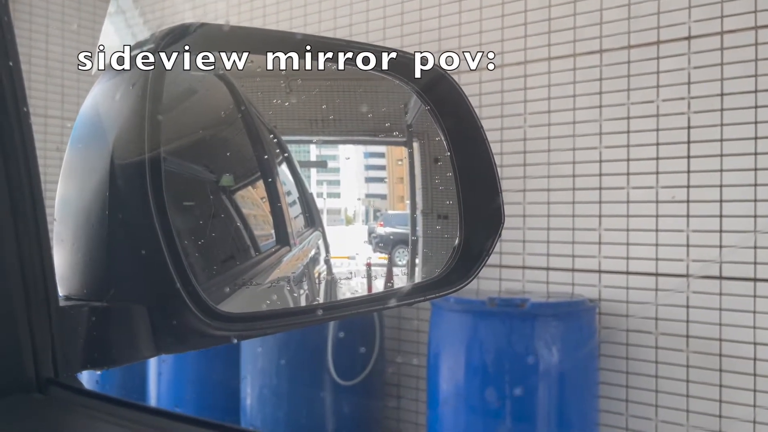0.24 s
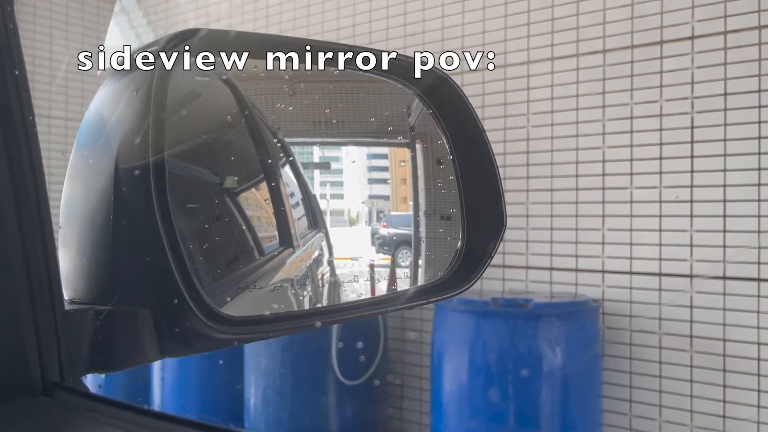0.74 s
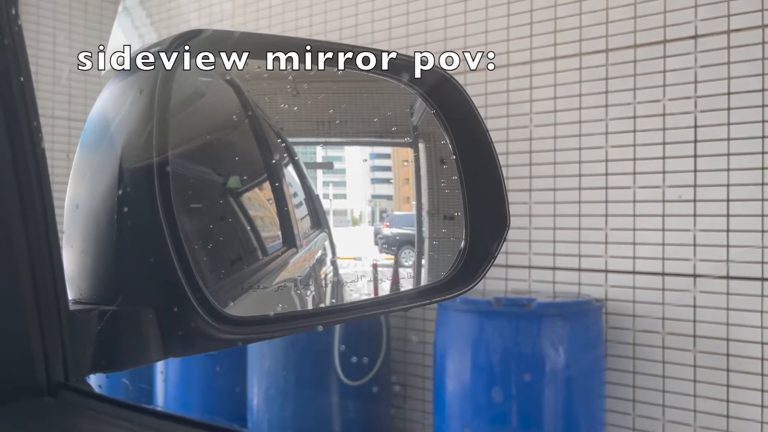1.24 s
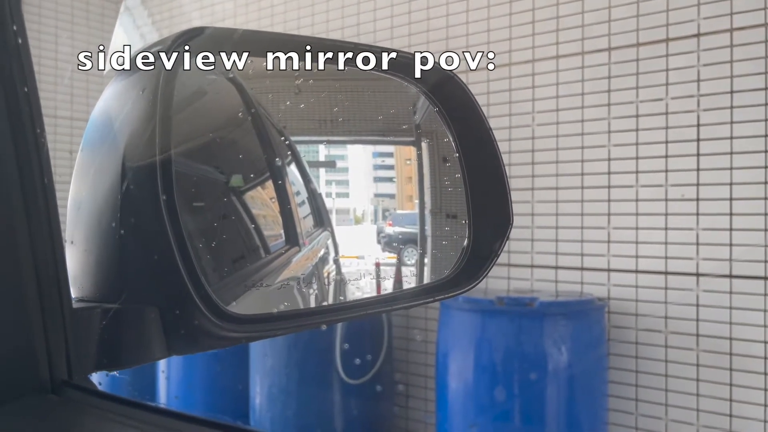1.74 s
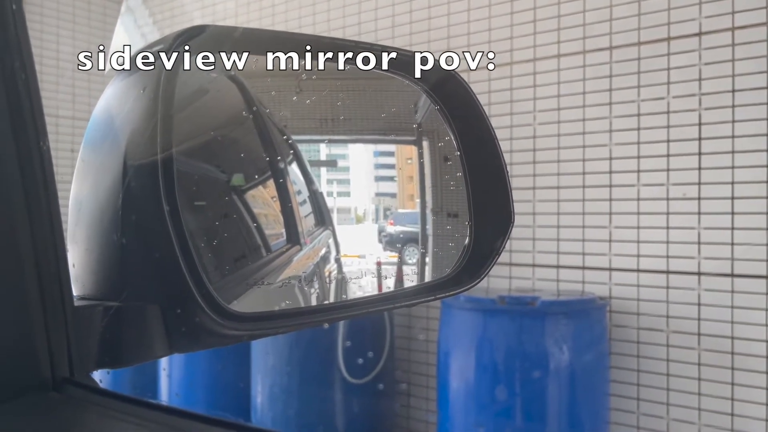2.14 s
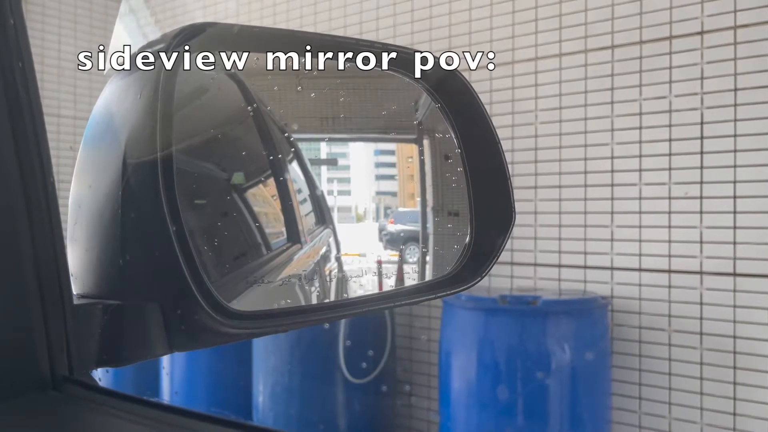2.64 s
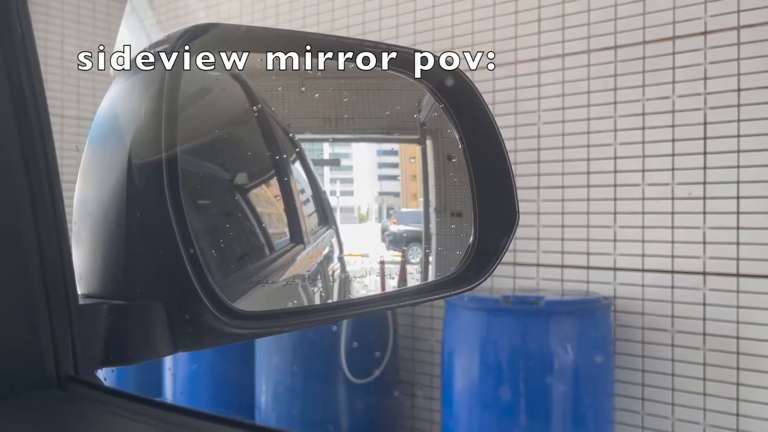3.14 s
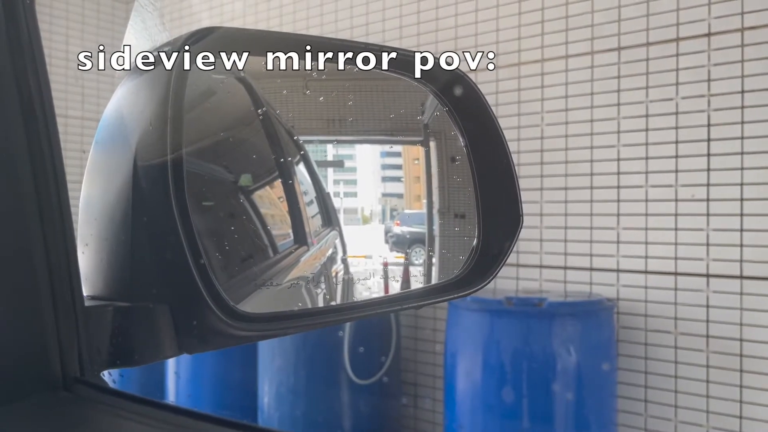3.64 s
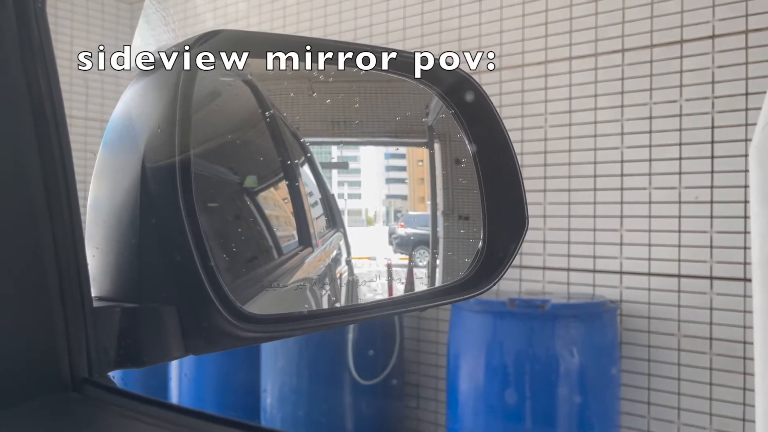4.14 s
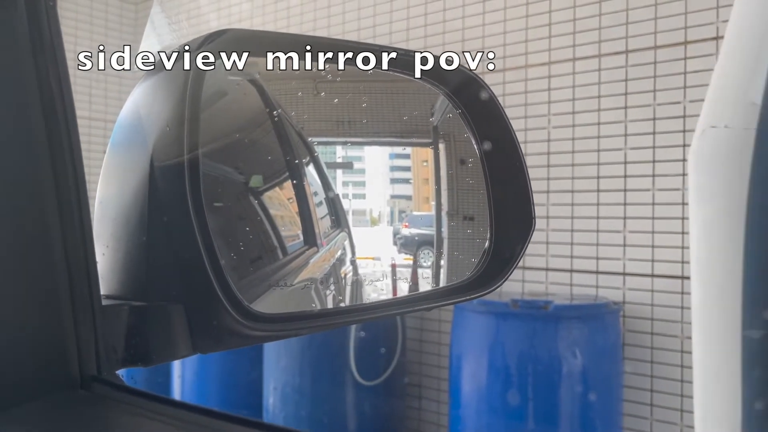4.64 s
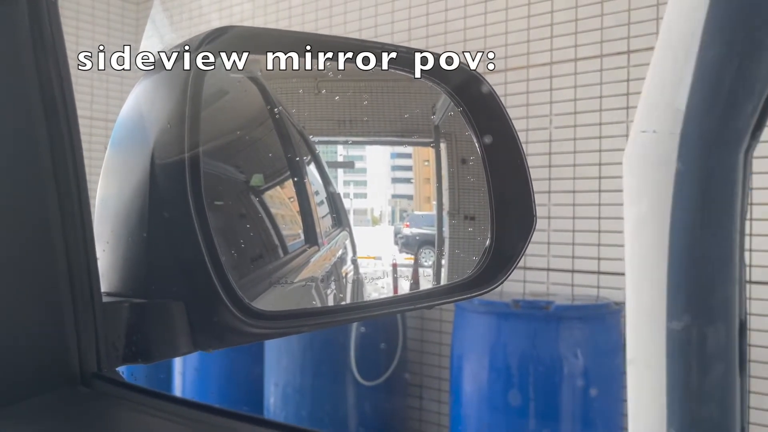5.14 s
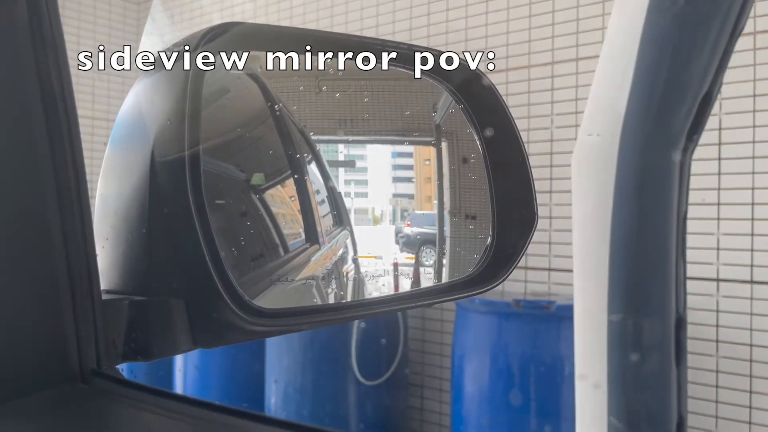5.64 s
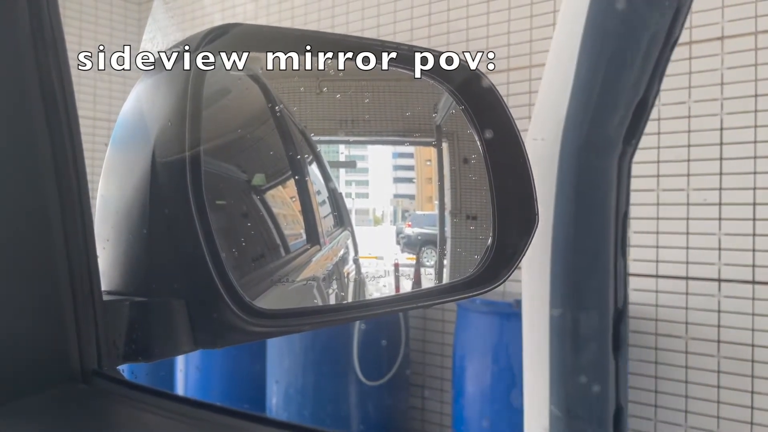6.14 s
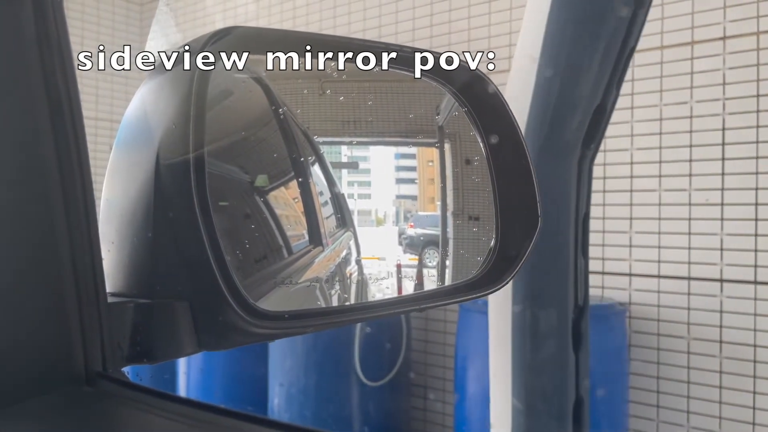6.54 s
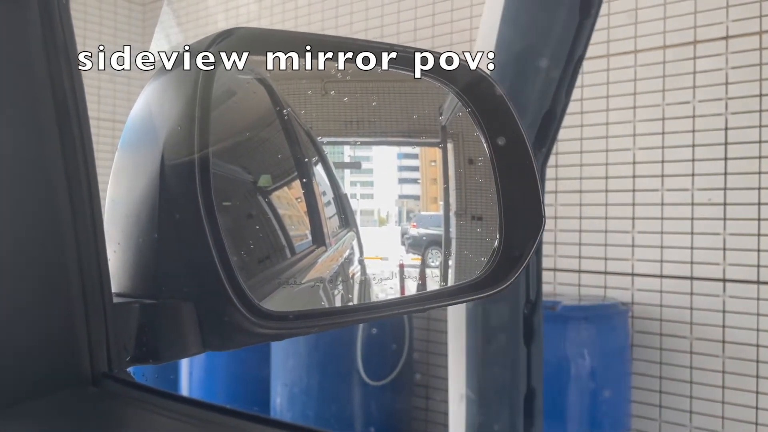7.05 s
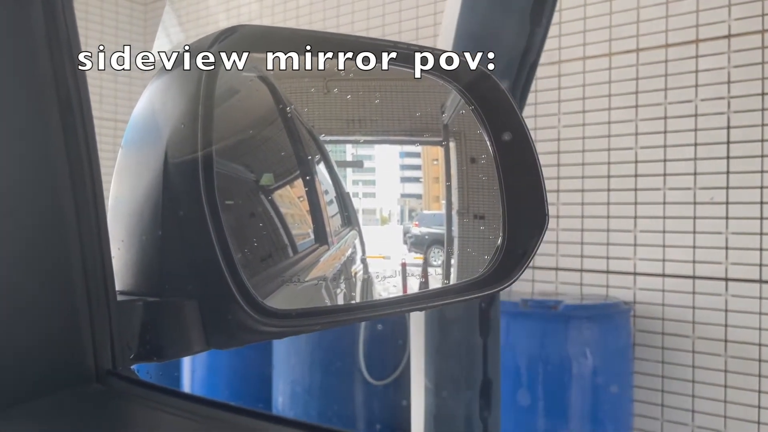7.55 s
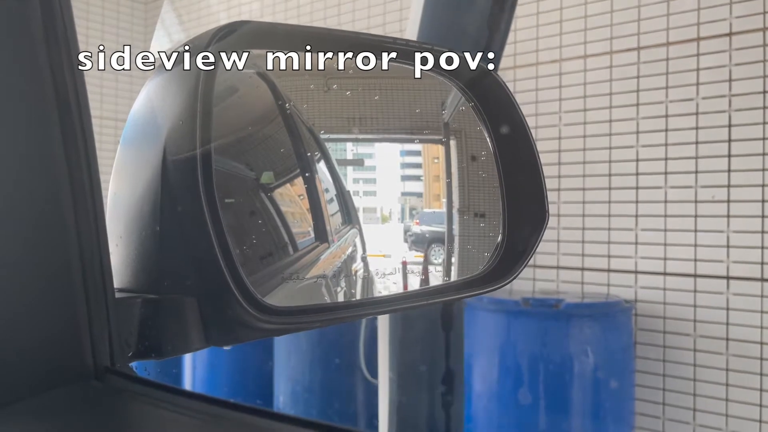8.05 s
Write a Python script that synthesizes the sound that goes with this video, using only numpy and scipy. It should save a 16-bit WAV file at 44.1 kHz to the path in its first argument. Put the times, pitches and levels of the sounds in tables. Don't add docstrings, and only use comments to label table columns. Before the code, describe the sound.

From 0 s a dense, bass-heavy roar fills a closed car cabin: dryer air outside booms in the enclosed air and rumbles on the panels. Rapid flutter, roughly eleven pulses a second, breaks into irregular dull thuds and slaps on the window, with a strong one near 1.4 s. From about 2 to 3.5 s the jet presses harder, several slaps cluster around 2.6-2.9 s, and a hollow low door resonance swells near 3 s. Quiet blower hiss, a nozzle's thin sizzle and a very faint high motor whine lie behind; the sizzle fades after 3.7 s. The heaviest slap lands at 4.0 s, followed by more buffeting to 5 s. The deep boom is thinner later, and tiny drops crack on the glass mostly between 6.8 and 7.6 s. Another strong slap comes at 7.95 s, then the roar suddenly eases just after 8.2 s. Close stereo cabin pickup, muffled and nearly without echo.

```python
import sys
import numpy as np
from scipy import signal
from scipy.fft import rfft, irfft, next_fast_len
from scipy.io import wavfile
from scipy.ndimage import uniform_filter1d, minimum_filter1d, map_coordinates

SR = 44100
rng = np.random.default_rng(int(sys.argv[2]) if len(sys.argv) > 2 else 0)


def field_ratio(decibels):
    return 10 ** (np.asarray(decibels, dtype=float) / 20)


def bounce(signal):
    frames = np.transpose(np.atleast_2d(signal))
    limited = np.clip(frames, -1, 1)
    pcm = np.round(limited * 32767).astype(np.int16)
    wavfile.write(sys.argv[1], SR, pcm)


N = 365140
T_S = np.arange(N) / SR

# (frequency [Hz], level [dB])
PORTS = [(60, -20.5), (110, -17.5), (190, -13), (350, -14), (630, -7), (1120, -1), (2020, 3.5), (3620, 1),
         (6510, -6), (11700, 0)]


def unit(x):
    return x / np.sqrt(np.mean(x ** 2) + 1e-20)


def along(points, hz):
    f, v = np.transpose(points)
    return np.interp(np.log(hz + 1), np.log(f + 1), v)


def curves(rows):
    s, *cols = np.transpose(rows)
    return [np.interp(T_S, s, c) for c in cols]


def wobble(rate_hz):
    knots = rng.standard_normal(int(N * rate_hz / SR) + 4)
    return map_coordinates(knots, [np.arange(N) * rate_hz / SR])


def filtered(x, response):
    m = next_fast_len(N + 8192)
    return irfft(rfft(x, m) * response(np.fft.rfftfreq(m, 1 / SR)), m)[..., :N]


def unlike(both, other):
    # (frequency [Hz], share [-1..1])
    lead = [(60, .3), (300, .6), (700, .5), (1200, .45), (1600, 0), (2000, -.4), (2500, .3), (7000, .4),
            (9000, 0)]
    locked = filtered(both, lambda hz: 1j * along(lead, hz))
    return locked + filtered(other, lambda hz: np.sqrt(1 - along(lead, hz) ** 2))


def rush(spectrum, patchy_db=0, diff_spectrum=None, diff_db=0, grain=1):
    z = signal.stft(rng.standard_normal((2, N)), nperseg=512)[2]
    field = uniform_filter1d(rng.standard_normal(z.shape[1:]), size=6, axis=0)
    field = uniform_filter1d(field, size=10, axis=1)
    patchy = z * field_ratio(patchy_db * unit(field))
    both, other = grain * signal.istft(patchy, nperseg=512)[1][:, :N]
    apart = unlike(both, other)
    both = filtered(both, lambda hz: field_ratio(along(spectrum, hz)))
    if diff_spectrum:
        apart = filtered(apart, lambda hz: field_ratio(along(diff_spectrum, hz)))
        return np.array([unit(both), field_ratio(diff_db) * unit(apart)])
    apart = filtered(apart, lambda hz: field_ratio(along(spectrum, hz) + along(PORTS, hz)))
    return np.array([both, apart]) / np.std(both)


def puffs(times_s, gains, spectrum, after):
    lag_s, share = np.transpose([(0.0011, 0.82)] + after)
    chance = rng.random((len(times_s), 2, len(lag_s)))
    at_s = times_s[:, None] + lag_s * (0.744 + .5 * chance[:, 0])
    height = gains[:, None] * share * np.sign(chance[:, 1] - .5)
    kicks = np.bincount((at_s * SR).astype(int).ravel(), height.ravel(), N)[:N]
    peak = np.mean(field_ratio(along(spectrum, np.linspace(0, SR / 2, SR))))

    def colour(hz):
        return field_ratio(along(spectrum, hz)) * np.array([1 + 0j * hz, 1j * field_ratio(along(PORTS, hz))])

    return filtered(kicks / peak, colour)


def steadied(pair, share, smooth_s):
    envelope = np.abs(signal.hilbert(pair[0], next_fast_len(N))[:N])
    swell = uniform_filter1d(envelope, size=int(smooth_s * SR))
    pair = pair / (swell + 0.14 * swell.mean()) ** share
    return pair / np.std(pair[0])


def jet():
    # (time [s], cabin air drive [dB], turbulence on the glass [dB], eddy beat depth [dB])
    path = [(0, -13.5, -18.5, -0.5), (.7, -14, -17.5, 2), (1.4, -12.5, -16, 5), (1.8, -15.5, -17, -1),
            (2.33, -12.5, -14.5, 0), (2.5, -17, -16.5, -0.5), (2.9, -13.5, -14.5, -0.5),
            (3.6, -19, -14.5, -1), (4.2, -18.5, -14, 2), (4.8, -20, -15, 0), (5.5, -16.5, -15.5, 2),
            (6, -17, -16.5, -1), (6.5, -18.5, -17, 0.5), (6.9, -18.5, -15.5, 4.5), (7.4, -19.5, -16.5, 1),
            (7.75, -18, -17.5, 0), (7.95, -21.5, -17, 8), (8.2, -15.5, -16, -1)]
    lull_s, lull_fall_s, lull_end_db = 8.215, 0.022, -11.5
    drive_db, turbulence_db, beat_db = curves(path)
    lull_db = lull_end_db * np.clip((T_S - lull_s) / lull_fall_s, 0, 1)
    return drive_db + lull_db, turbulence_db + lull_db, beat_db, lull_db


def shedding():
    shed_hz, lead_cycles, wander_cycles = 11.0, .46, .1
    return np.cos(2 * np.pi * (shed_hz * T_S + lead_cycles + wander_cycles * wobble(2.67)))


def gusts(times_s):
    hush_s, gust_s, gust_db = 0.0058, 0.021, 3
    t = np.arange(-SR // 10, SR // 10 + 1) / SR
    shape = np.exp(-((t - .014) / gust_s) ** 2) - 0.79 * np.exp(-((t + 0.015) / hush_s) ** 2)
    eddies = np.bincount((times_s * SR).astype(int), minlength=N)
    return gust_db * signal.fftconvolve(eddies, shape, "same")


def blowers():
    # (frequency [Hz], density [dB per Hz])
    hiss_sum = [(1000, -11), (1700, -4.5), (1940, -6), (2340, -4.5), (2970, -10), (3500, -9), (4000, -12.5),
                (5790, -16.5), (6190, -15), (7060, -22), (8810, -18.5), (9900, -21), (10900, -23),
                (12400, -29), (12500, -90)]
    hiss_diff = [(1000, -27), (1700, -5), (2060, -13.5), (2850, -9.5), (3300, -14.5), (5260, -18.5),
                 (6440, -23), (8010, -25), (8600, -22.5), (9200, -24), (10000, -18.5), (11000, -24.5),
                 (11600, -31), (11750, -87.5)]
    sizzle_sum = [(1900, -33.5), (2400, -2.5), (3200, -8.5), (4200, 1), (4800, -12.5), (7000, -18.5),
                  (7550, -10), (8100, -15), (8700, -8.5), (10000, -13.5), (11100, -7.5), (12200, -22.5),
                  (12500, -72.5)]
    sizzle_diff = [(2400, -55.5), (3000, 6), (3500, -10), (8000, -21), (8600, -21), (9900, -2), (11100, -4),
                   (11600, -22), (11800, -68)]
    # (frequency [Hz], level [dB])
    sidebands = [(8240, -77), (8435, -74), (8667, -70), (8899, -81.5), (8980, -85.5), (9134, -75),
                 (9561, -84.5)]
    # (time [s], nearness [dB])
    nozzle = [(0, -60.5), (1.0, -58.5), (1.9, -57), (2.3, -56.5), (2.64, -57.5), (2.72, -56.5), (2.84, -58),
              (3.35, -58.5), (3.7, -60), (3.9, -63), (4.3, -66), (8.28, -74.5)]
    hiss_start_db, hiss_fade_db_per_s, hiss_follows = -46.5, -0.1139, 0.2

    nearness_db, = curves(nozzle)
    flutter = wobble(5.1)
    hiss_db = hiss_start_db + hiss_fade_db_per_s * T_S + hiss_follows * (nearness_db + 59.5)
    hiss_db = hiss_db + 0.14 + .15 * flutter
    hiss = field_ratio(hiss_db) * rush(hiss_sum, 1.0, hiss_diff, diff_db=-3.0)
    sizzle_db = 2.7 * (nearness_db + 59) - 56.5 + 0.44 * flutter + .8 * wobble(19) + 0.6 * wobble(26)
    sizzle = field_ratio(sizzle_db) * rush(sizzle_sum, 1.4, sizzle_diff, diff_db=-2.0)

    whine = np.zeros((2, N))
    for port, shift_hz in enumerate((0, 1235)):
        for hz, db in sidebands:
            level = field_ratio(db + 2 + 1.5 * wobble(6))
            whine[port] += level * np.sin(2 * np.pi * (hz + shift_hz) * T_S + 1.5 * wobble(25))
    return hiss + sizzle + whine


def roar(shed):
    # (frequency [Hz], density [dB per Hz])
    boom_spectrum = [(15, -44.5), (25, -29), (41, -7), (58, 3.5), (75, -1), (100, -7), (125, -13.5),
                     (170, -46.5), (290, -120)]
    panel_spectrum = [(35, -34.5), (60, -22.5), (92, 1), (135, 3.5), (177, -1.5), (226, -3), (300, -14.5),
                      (390, -44.5), (660, -120)]
    # (time [s], push [dB])
    push = [(0, -20), (.7, -17.5), (1.4, -18), (2.1, -19), (2.5, -18.5), (2.9, -17.5), (3.4, -17.5),
            (4.2, -16), (5, -17.5), (5.7, -18), (6.35, -18), (6.9, -16.5), (7.5, -20), (8.2, -19)]
    cabin_hz, cabin_width_hz = 84.4, 16.8
    door_hz, door_width_hz = 253, 45
    door_s, door_span_s = 3.03, 0.96

    drive_db, _, beat_db, lull_db = jet()
    over_db = drive_db + 15.5
    boom_db = -16.5 + .6 * over_db - 0.4 * (T_S - 4) + 1.8 * wobble(13)
    mode_db = -15 + 1.5 * over_db + 1.3 * wobble(11)
    rumble_db = 4 + curves(push)[0] + 0.74 * lull_db + 0.49 * beat_db * shed + 1.32 * wobble(8)
    door_db = -23 - 6 * ((T_S - door_s) / door_span_s) ** 2 + 1.5 * wobble(5.1)

    def resonance(hz):
        damping = 1j * hz * cabin_width_hz
        return (damping / (cabin_hz ** 2 - hz ** 2 + damping)) ** 2

    mode = filtered(rush([(60, 0), (120, -.1)]), resonance)
    mode = steadied(mode, share=1.0, smooth_s=0.062)
    boom = steadied(rush(boom_spectrum), share=0.52, smooth_s=0.052)
    rumble = steadied(rush(panel_spectrum), share=0.5, smooth_s=0.051)
    door = rush([(100, -40), (door_hz - door_width_hz, -12), (door_hz, 0),
                 (door_hz + door_width_hz, -12), (600, -60)])
    return field_ratio(door_db) * door + field_ratio(boom_db) * boom + field_ratio(mode_db) * mode + field_ratio(rumble_db) * rumble


def buffet(shed):
    # (time [s], peak [dB], edge over peak [dB])
    strong = [(0.294, -8.5, -19), (0.449, -9, -7.5), (0.721, -7.5, -31), (0.998, -13, -17),
              (1.38, -2, -13.5), (1.452, -7, -27), (2.376, -8.5, -17), (2.596, -7, -24), (2.744, -6, -24),
              (2.853, -1.5, -26), (3.412, -10.5, -7.5), (3.487, -14.5, -21), (3.936, -6, -13.5),
              (4.017, 3, -22.5), (4.057, -6.5, -14.5), (4.157, -4.5, -26), (4.349, -7, -20.5),
              (4.387, -6, -16.5), (4.41, -12.5, -21.5), (4.661, -7, -24), (4.755, -6.5, -19.5),
              (4.936, -3.5, -21.5), (6.602, -15, -19), (6.8, -6.5, -20.5), (6.85, -10, -20),
              (6.961, -10, -11.5), (7.209, -9.5, -7), (7.388, -15, -23.5), (7.594, -11.5, -12.5),
              (7.95, -1, -25), (8.245, -17.5, -25)]
    lesser = [(0.091, -9, -20), (0.256, -2, -24), (0.345, -4, -20), (0.542, -8.5, -25), (0.618, -7, -20),
              (0.694, -5.5, -19), (0.779, -7.5, -19), (0.898, -8.5, -14), (0.938, -14.5, -17),
              (1.045, -0.5, -16.5), (1.181, -2, -25), (1.71, -8.5, -12), (1.75, -6.5, -18),
              (1.787, -10, -22), (1.845, -3.5, -21), (2.176, -6.5, -29), (2.203, -6, -13), (2.238, -9, -17),
              (2.335, -4.5, -18.5), (2.489, -4.5, -23), (2.537, -5, -20), (2.572, -2, -16.5),
              (2.715, -0.5, -14.5), (2.8, -5.3, -18), (2.945, 0.7, -26), (3.106, -9, -14),
              (3.331, -4.5, -29), (3.573, -3, -12.5), (3.629, -6, -16), (4.322, -16, -22),
              (4.578, -2, -10.5), (4.693, -8, -11.5), (4.841, -3.7, -18), (5.021, -9, -19),
              (5.048, -8, -14), (5.094, -5, -19.5), (5.199, -6.5, -25), (5.398, -6.5, -22),
              (5.518, -9.5, -25.5), (5.573, -7.5, -26), (5.668, -9.5, -21), (5.805, -9.5, -15.5),
              (6.002, -6, -12), (6.084, -4, -16), (6.115, -13.5, -15.5), (6.174, -6.5, -29),
              (6.22, -4, -18.5), (6.369, -9.5, -11.5), (6.579, 2, -25), (6.663, -6, -11.5), (6.75, -6, -18),
              (6.904, -5.5, -29), (7.142, -2.5, -20), (7.317, -7, -14.5), (7.419, -7, -28.5),
              (7.5, -18, -22.5), (7.663, -6, -21.5), (7.864, -9.5, -15), (8.043, -7.5, -28.5),
              (8.205, -11, -22)]
    # (time [s], peak [dB])
    drops = [(1.3793, -32), (4.3884, -30), (6.8007, -28.5), (6.8683, -34), (6.989, -30), (7.2085, -26.5),
             (7.5933, -32)]
    # (frequency [Hz], density [dB per Hz])
    thud_spectrum = [(120, -39), (200, -3), (248, 2.5), (355, -1), (583, -11), (900, -25.5), (1170, -65.5),
                     (1980, -120)]
    edge_spectrum = [(410, -13), (700, 1.5), (846, -2), (1020, -7), (1500, -12), (2000, -22), (2600, -53),
                     (4400, -120)]
    # (frequency [Hz], level [dB])
    slap_spectrum = [(150, -41), (280, 2), (420, 2.5), (650, -8.5), (950, -30.5), (1400, -40.5),
                     (2500, -94)]
    tick_spectrum = [(400, -31), (750, 9.5), (1100, -1), (1600, -16.5), (2200, -27.5), (3500, -70.5)]
    crack_spectrum = [(500, -28), (1000, 1), (1600, 2.5), (2300, -7), (3000, -15.5), (4500, -62)]
    lesser_peak_db, lesser_edge_db, lesser_gust_share = -4, -2, .6

    _, turbulence_db, beat_db, lull_db = jet()
    strong_s, strong_db, strong_bright_db = np.transpose(strong)
    small_s, small_db, small_bright_db = np.transpose(lesser)
    gust_db = gusts(strong_s) + lesser_gust_share * gusts(small_s) - 1.5
    eddies = wobble(160)

    thud = rush(thud_spectrum, grain=field_ratio(0.41 * shed + 3.27 * eddies))
    thud_db = turbulence_db - 2.0 + gust_db + beat_db * shed + 0.57 * wobble(21)
    thud = field_ratio(thud_db) * steadied(thud, share=0.23, smooth_s=0.094)

    edge_db = -38 + 1.5 * (turbulence_db + 17) - 1.3 * lull_db - 0.36 * (T_S - 4)
    edge_db = edge_db + 0.42 * gust_db + 0.55 * wobble(7.1)
    edge = field_ratio(edge_db) * rush(edge_spectrum, patchy_db=1.25, grain=field_ratio(0.66 * shed + 0.28 * eddies))

    s = np.r_[strong_s, small_s]
    peak_db = np.r_[strong_db, small_db + lesser_peak_db]
    bright_db = np.r_[strong_bright_db, small_bright_db + lesser_edge_db]
    slaps = puffs(s + 0.00154, field_ratio(peak_db + 1.5), slap_spectrum, after=[(.003, 0.72), (.0065, 0.58)])
    ticks = puffs(s + 0.0011, field_ratio(peak_db + bright_db + 5.0), tick_spectrum, after=[(.0025, .55)])
    crack_s, crack_db = np.transpose(drops)
    cracks = puffs(crack_s, field_ratio(crack_db + 1.5), crack_spectrum, after=[(.0025, .45)])
    return thud + edge + slaps + ticks + cracks


def scene():
    # (frequency [Hz], level [dB])
    balance = [(60, .3), (350, .9), (630, 2.2), (1120, 2.5), (2020, 1), (5000, 1.4), (7500, .3), (8000, 0)]
    cancel_hz, cancel_width_hz = 10230, 330
    shed = shedding()
    both, apart = blowers() + roar(shed) + buffet(shed)
    both = filtered(both, lambda hz: 1 - np.exp(-((hz - cancel_hz) / cancel_width_hz) ** 2))
    pair = np.array([both + apart, both - apart])
    return filtered(pair, lambda hz: field_ratio(along(balance, hz) * np.array([[.5], [-.5]])))


def roll_off(x):
    return signal.sosfilt(signal.butter(12, 12380, fs=SR, output="sos"), x)


def record(dry):
    ceiling, hold, fade_s = .9, int(.004 * SR), .0015
    dry = dry * np.sin(np.pi / 2 * np.minimum(1, T_S / fade_s)) ** 2
    low = filtered(dry, lambda hz: 1 / (1 + (hz / 1800) ** 4))
    need = np.minimum(1, ceiling / (np.abs(dry).max(axis=0) + 1e-9))
    gain = minimum_filter1d(need, size=2 * hold + 1)
    gain = uniform_filter1d(uniform_filter1d(gain, size=hold), size=hold)
    held = filtered(dry + low * (gain - 1), lambda hz: hz < 12400)
    return roll_off(held)


dry = scene()
out = record(dry)
bounce(out)
```